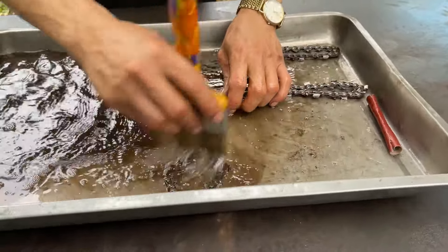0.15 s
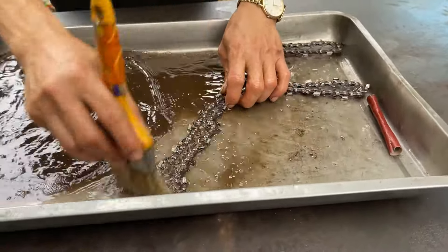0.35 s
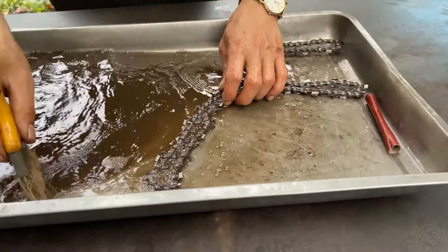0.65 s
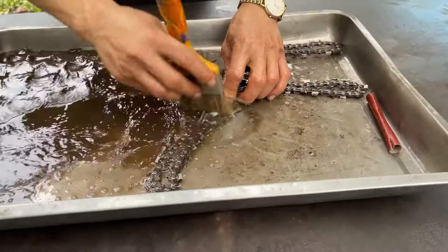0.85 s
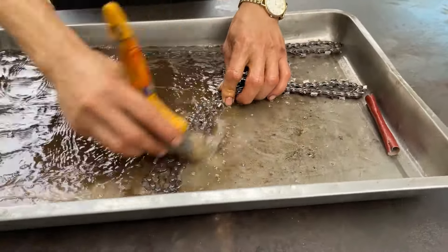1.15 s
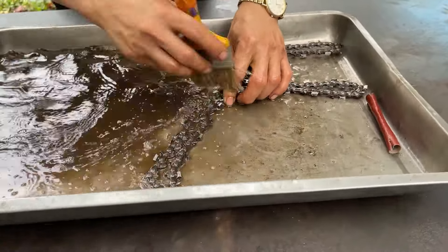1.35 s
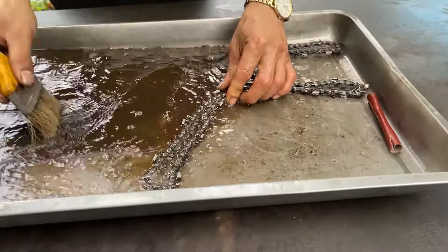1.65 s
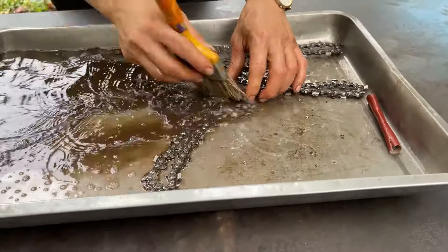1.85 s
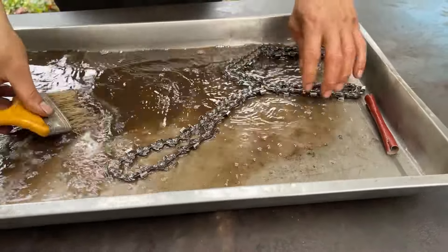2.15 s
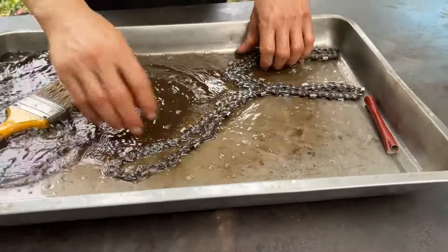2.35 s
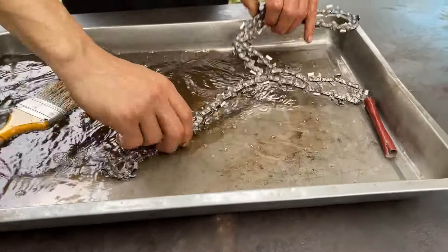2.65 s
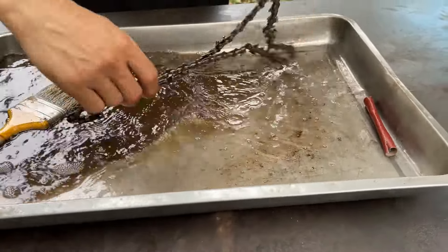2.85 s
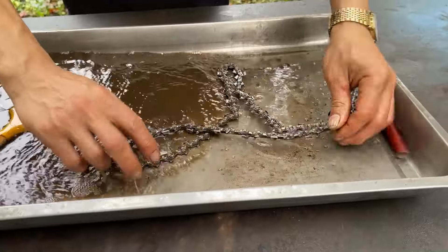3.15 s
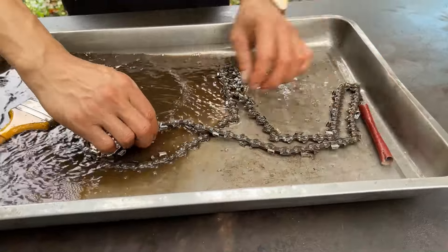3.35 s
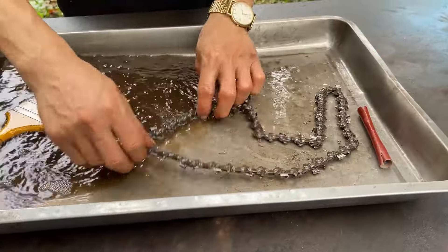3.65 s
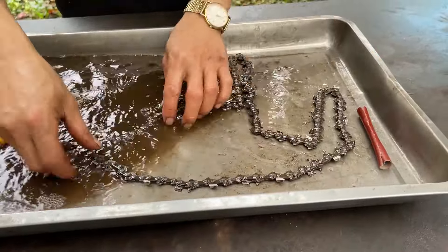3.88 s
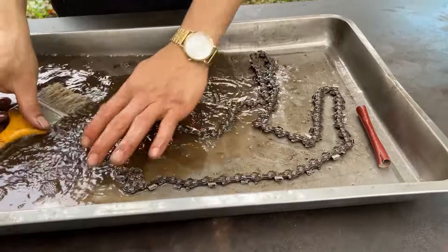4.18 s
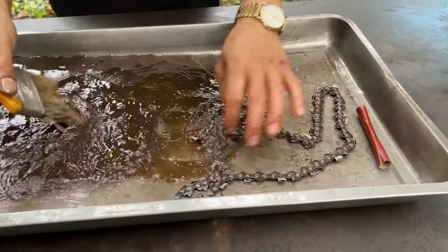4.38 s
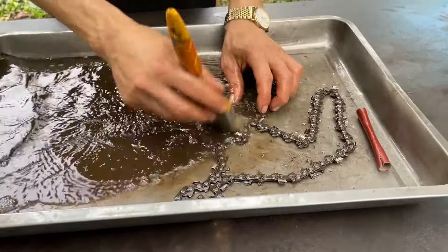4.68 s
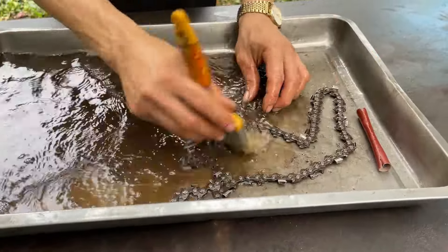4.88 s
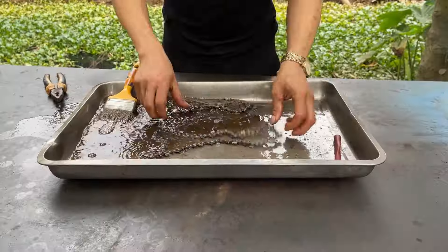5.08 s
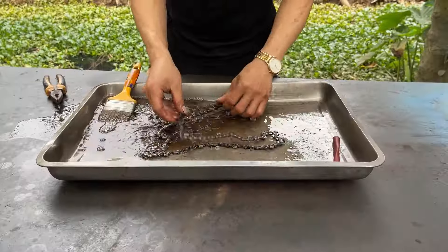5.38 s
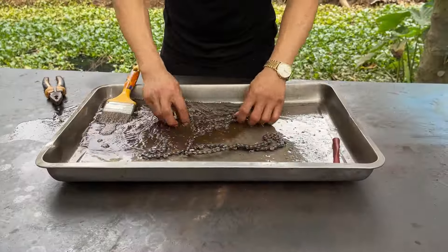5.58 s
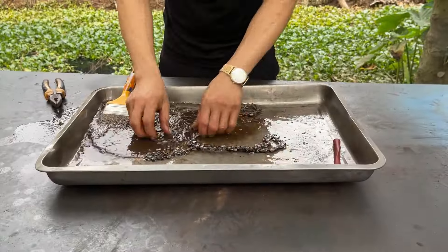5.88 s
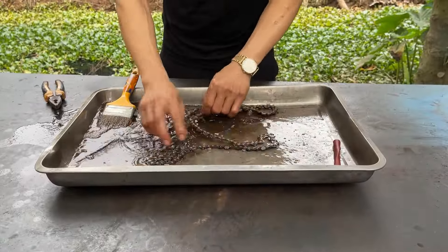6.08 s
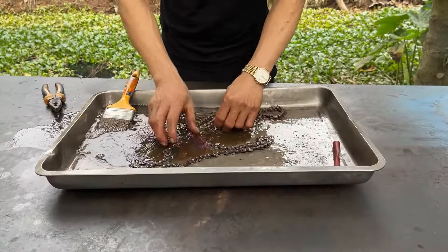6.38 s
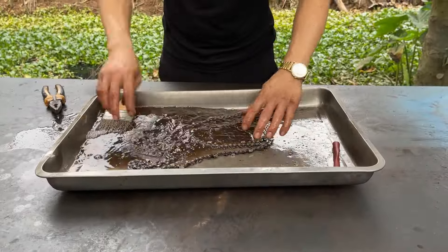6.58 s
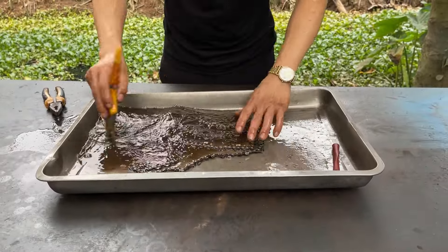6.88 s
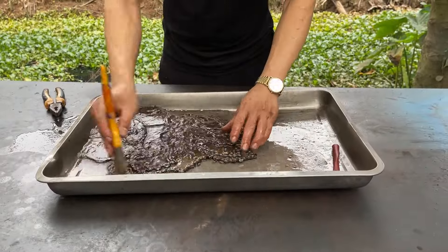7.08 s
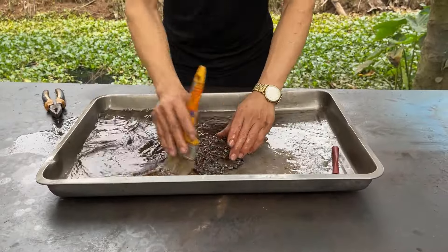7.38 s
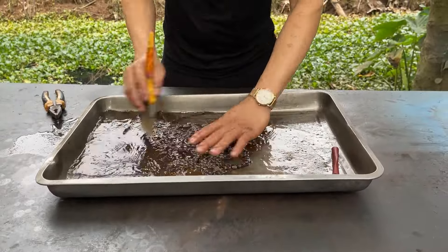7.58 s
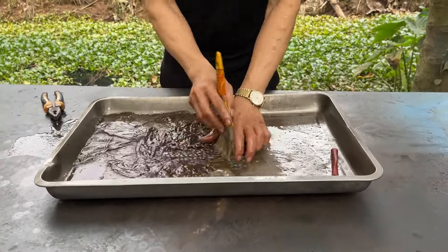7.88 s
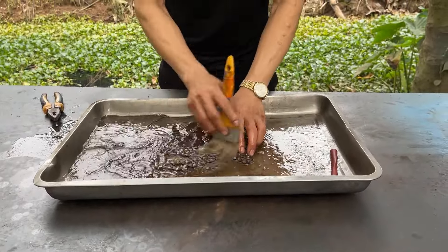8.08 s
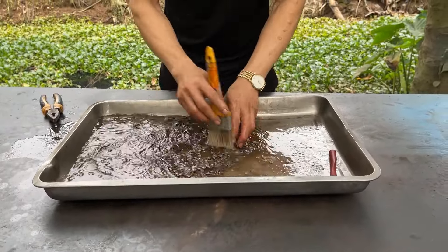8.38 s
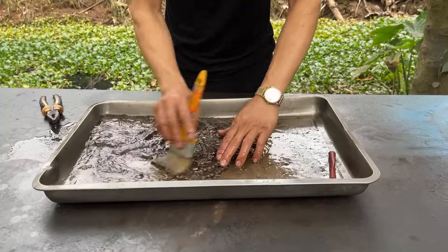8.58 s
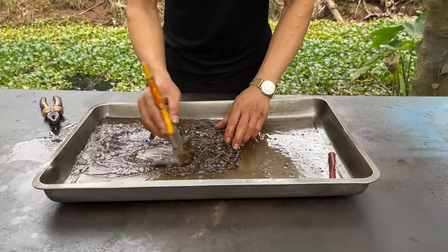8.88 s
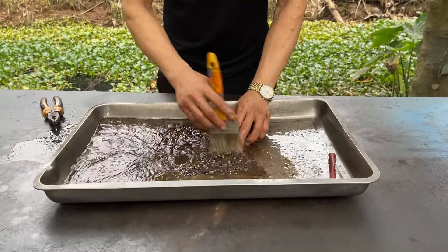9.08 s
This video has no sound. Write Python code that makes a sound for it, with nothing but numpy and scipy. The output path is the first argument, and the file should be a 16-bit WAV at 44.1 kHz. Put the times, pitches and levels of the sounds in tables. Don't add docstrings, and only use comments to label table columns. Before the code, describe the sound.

A wet metal chain is brushed, dragged and dropped in a shallow steel tray of liquid, with sharp clanks, rattling links and gritty bristle scraping outdoors.

```python
import sys
import numpy as np
from scipy import signal
from scipy.fft import rfft, irfft
from scipy.io import wavfile

SR = 44100
rng = np.random.default_rng(int(sys.argv[2]) if len(sys.argv) > 2 else 0)


def amp(db):
    return 10 ** (np.asarray(db, float) / 20)


def write(x):
    x = np.atleast_2d(x).T
    wavfile.write(sys.argv[1], SR, np.round(np.clip(x, -1, 1) * 32767).astype(np.int16))


N = 407484
SPLICE_S = 5.13


def rms_one(x):
    return x / np.sqrt(np.mean(x ** 2) + 1e-20)


def drift(rate):
    r = np.exp(-80 * np.pi * rate / SR)
    slow = signal.lfilter([1], [1, -2 * r, r * r], rng.standard_normal(N // 40 + 2002))[2000:]
    return np.interp(np.arange(N) / 40, np.arange(len(slow)), rms_one(slow))


def colour(x, points):
    hz, level_db = np.transpose(points)
    grid = np.maximum(np.fft.rfftfreq(8192, 1 / SR), 5)
    cepstrum = irfft(np.log(amp(np.interp(np.log(grid), np.log(hz), level_db))))
    cepstrum[1:4096] *= 2
    cepstrum[4097:] = 0
    response = irfft(np.exp(rfft(cepstrum)))
    return signal.fftconvolve(x, response[None] / np.linalg.norm(response), axes=1)[:, :N]


def resonance(x, hz, width_hz):
    r = np.exp(-np.pi * width_hz / SR)
    poles = [1, -2 * r * np.cos(2 * np.pi * hz / SR), r * r]
    return np.sqrt((1 - r * r) / 2) * signal.lfilter([1, 0, -1], poles, x + 1e-18)


def contacts(per_s, spread_db, clump_db, clump_rate, alike):
    born = rng.random(N) < per_s / SR
    sizes = amp(spread_db * np.minimum(rng.exponential(1, N), 3.2)) * rng.choice([-1, 1], N)
    clicks = rms_one(born * sizes)
    lag = np.round(40 * drift(6)).astype(int)
    right = clicks[np.clip(np.arange(N) + lag, 0, N - 1)]
    alike = np.clip(alike, 0, 1)
    pair = np.sqrt(alike) * np.array([clicks, right]) + np.sqrt(1 - alike) * rng.standard_normal((2, N))
    return rms_one(pair * amp(clump_db * drift(clump_rate)))


def strokes():
    # (full from [s], length [s], tray drone [dB], rasp against drone [dB]) brush sweeps and drags,
    # first at the near stand, then at the far one
    sweeps = [(0.12, 0.13, -35.5, -1.5), (0.172, 0.13, -36.5, 2), (0.3, 0.32, -33, -2),
              (0.826, 0.085, -35.5, -8.5), (0.956, 0.06, -47, 5.5), (1.01, 0.11, -34, -4.5),
              (1.24, 0.096, -32.5, -3), (1.468, 0.098, -51.5, 9), (1.527, 0.15, -39.5, 3),
              (1.953, 0.13, -43.5, -4.5), (2.03, 0.14, -31.5, -1.5), (2.075, 0.23, -34.5, 4.5),
              (2.594, 0.088, -33.5, 0), (2.776, 0.1, -32, 9.5), (2.82, 0.16, -34, 5.5),
              (3.332, 0.074, -24, -4), (3.684, 0.1, -33.5, -0.2), (4.01, 0.14, -27.5, 4),
              (4.075, 0.12, -29, 3.5), (4.258, 0.043, -38, -17), (4.345, 0.14, -28, 8),
              (4.41, 0.14, -30.5, 7.5), (4.995, 0.12, -28.5, 4),
              (5.534, 0.094, -24.5, -3.5), (5.651, 0.092, -38, 0), (5.702, 0.058, -37, -1.5),
                  (5.777, 0.19, -29.5, 2), (6.057, 0.17, -35.5, -3), (6.306, 0.15, -29.5, 1.5),
                  (6.51, 0.17, -33, 0.5), (6.821, 0.17, -28.5, 4), (7.053, 0.19, -30, 1),
                  (7.237, 0.14, -25.5, 3.5), (7.436, .1, -35, -2), (7.496, 0.11, -32.5, -1),
                  (7.928, 0.18, -26.5, 2), (8.171, 0.22, -30.5, -2), (8.378, 0.18, -28, -1),
                  (8.638, 0.1, -30.5, 0.5), (8.715, 0.31, -31, 0.5), (8.815, 0.25, -34.5, -0.5),
                  (8.959, 0.067, -37.5, -9), (9.082, 0.19, -34, -1.5)]
    pushes = [(0.05, 0.087, -38.5, -5.5), (0.47, 0.13, -40, -18), (0.545, 0.19, -38, 0.5),
              (0.608, 0.14, -38.5, 1), (0.777, 0.083, -36.5, -6), (1.88, 0.67, -65, -4),
              (2.452, 0.051, -44, -13), (2.69, 0.087, -32.5, 0.5), (2.887, 0.096, -36, 2.5),
              (3.142, 0.14, -33.5, -2), (3.475, 0.12, -37.5, -11), (3.63, 0.17, -31, -8.5),
              (3.777, 0.11, -24.5, 0.5), (4.228, 0.036, -42.5, -9), (4.817, 0.15, -28.5, 4),
              (5.11, 0.043, -43, -40), (6.245, 0.058, -33.5, -6.5), (6.438, 0.15, -37, -2.5),
              (7.845, 0.26, -28, 4), (6.59, 0.082, -39, 3), (8.093, 0.056, -34.5, -2),
              (8.132, 0.049, -30, -1)]
    link_drops = [(0.0, 0.088, -29.5, 0.5), (0.385, 0.069, -26.5, 5), (0.738, 0.023, -44.5, -2),
                  (1.044, 0.026, -27, -9), (1.119, 0.024, -41, -10), (1.246, .02, -28.5, -11),
                  (1.26, 0.016, -28, -9), (1.27, 0.012, -30, -8), (1.338, 0.025, -37.5, -14),
                  (1.639, 0.032, -41, -28), (1.747, 0.27, -47.5, 3.5), (2.288, 0.036, -17.5, -3),
                  (2.331, 0.045, -23, -10.5), (2.407, 0.032, -32, -7), (2.483, 0.031, -26.5, -4.5),
                  (2.655, 0.02, -36.5, -1), (2.748, .03, -34.5, -5), (3.031, 0.059, -19, -6.5),
                  (3.113, 0.044, -31.5, -1), (3.167, 0.031, -24, -3), (3.202, 0.043, -21, -2.5),
                  (3.253, 0.052, -26, -3), (3.304, 0.032, -37.5, -10), (3.431, 0.044, -38.5, -2),
                  (3.727, 0.1, -30.5, 4.5), (3.956, 0.098, -37, -10), (4.132, 0.045, -26.5, 1.5),
                  (4.287, 0.026, -45, -9), (4.313, 0.03, -36, 5), (4.328, .06, -37, 1),
                  (4.36, 0.069, -27.5, 10.5), (4.51, 0.18, -51.5, 6), (4.738, 0.13, -35, -5),
                  (4.804, .04, -35, 6), (4.973, 0.034, -31.5, 4),
                  (5.161, 0.027, -36, -5), (5.176, .012, -31, -4), (5.181, 0.065, -22, -1),
                 (5.316, .02, -42, -1), (5.327, 0.032, -32.5, -15), (5.394, 0.083, -32, -3),
                 (5.493, .015, -33, -3), (5.502, 0.081, -20.5, -4), (5.961, 0.2, -36, -4.5),
                 (6.145, 0.077, -24, 1), (6.772, 0.071, -38, -5), (7.0, .05, -46.5, 7),
                 (7.082, .04, -35, -3), (7.229, .05, -28, 9), (7.491, .04, -39, -4), (7.198, .05, -46, -7),
                 (7.535, 0.066, -26, 1), (7.561, 0.058, -31.5, -6), (7.733, 0.44, -31, -0.5),
                 (8.259, 0.13, -29.5, -2)]
    sweep_shape = (0.25, 0.14, 0.55, 1.75)
    push_shape = (0.4, 0.14, 0.3, 1.66)
    drop_shape = (0.0, 0.08, 0.92, 1.25)
    drop_rise_s = 0.0027
    touch_s, touch_db, weight_after_s = 0.017, -17, 0.0016

    drops = link_drops
    kinds = [(sweeps, sweep_shape), (pushes, push_shape), (drops, drop_shape)]
    rows = [(*row, *shape) for table, shape in kinds for row in table]
    rows += [(s, touch_s, db + touch_db, rasp_db + 10.0, 1, 0, .3, 1.775) for s, _, db, rasp_db in drops]
    s, length, drone_db, rasp_db, rise, hold, fall, roundness = np.transpose(rows)[:, :, None]
    s = s + weight_after_s * (rise * length < drop_rise_s)

    grid = np.arange(0, N + 32, 32) / SR
    before = np.maximum(s - grid, 0) / np.maximum(rise * length, drop_rise_s)
    after = np.maximum(grid - s - hold * length, 0) / np.maximum(fall * length, .005)
    away = np.minimum(before + after, 5).astype(np.float32) ** roundness.astype(np.float32)
    drone = np.sum(amp(4.033 * (drone_db - 17.8 * away)), axis=0) ** (1 / 4)
    rasp = np.sum(amp(3.906 * (drone_db + rasp_db - 25.5 * away)), axis=0) ** (1 / 4)
    return [np.interp(np.arange(N) / SR, grid, e) for e in (drone, rasp)]


def knocks():
    # (time [s], peak [dB], rasp against peak [dB], loudest
    # ring [Hz])
    tray_knocks = [(0.386, -13.5, -16, 1560), (0.744, -24, -16, 910), (1.045, -3.5, -6, 1080),
                   (1.117, -30.5, 2.5, 1150), (1.245, -26, -12, 1580), (1.338, -22, -31, 1170),
                   (1.642, -23, -37, 1195), (1.749, -33, -23, 1210), (1.879, -31, -11, 3120),
                   (1.908, -33, -11, 2355), (1.907, -30.5, -19, 1400), (1.962, -25, -21, 826),
                   (1.939, -27, -25, 830), (2.033, -25, 12, 830), (2.29, -9, -4, 1076),
                   (2.296, -16, -12, 1570), (2.333, -16, -14, 820), (2.407, -23.5, -11, 744),
                   (2.483, -21, -2.5, 810), (2.601, -14, -15, 1444), (3.035, -7.5, -24, 600),
                   (3.136, -24, 5, 770), (3.204, -10, 7, 1406), (3.26, -15, 3, 1590), (3.306, -17, 1, 784),
                   (3.34, -14, -9, 997), (3.725, -17, -5, 1420), (3.764, -14, -6, 2220),
                   (3.783, -7.5, 10, 2320), (3.782, -10, -19, 305), (4.005, -17, -10, 1570),
                   (4.135, -13.5, -2, 1240), (4.733, -19, -5, 1420),
                   (5.183, -5.5, -2, 920), (5.505, -9, -4, 742), (5.535, -12, 3, 867),
                  (6.145, -23, -11, 1380), (6.773, -29, -5, 880), (6.859, -30, -10, 1760),
                  (7.202, -21, -4, 1020), (7.247, -5, -1, 1490), (7.734, -21.5, -30, 1220),
                  (7.893, -19, -17, 820), (8.176, -11, -7, 1536), (8.394, -13.5, -2, 816),
                  (8.392, -12.5, 4, 1406), (8.722, -11, -4, 840)]
    t60_at_1khz_s, damping = 0.076, 0.43
    swell_s, choke_s = 0.002, 0.015
    glide_per_s = 2.5

    thud, crack, rings = np.zeros((2, N)), np.zeros((2, N)), np.zeros((2, N))
    t = np.arange(int(.1 * SR)) / SR
    rise = 1 - np.exp(-t / 0.0018)
    ring_swell = (1 - np.exp(-t / swell_s)) * np.exp(-(t / choke_s) ** 2)
    table = tray_knocks
    chance = rng.standard_normal((len(table), 3))
    for (s, peak_db, crack_db, hz), (lag, pan, phase) in zip(table, chance):
        t60 = np.clip(t60_at_1khz_s * (1000 / hz) ** damping, .02, .3)
        beat_hz = hz * (1 + 0.042 * (lag + 3 * np.sign(lag)))
        for side in range(2):
            at = max(0, round(s * SR + (side - .5) * 22 * lag))
            span, room = slice(at, at + len(t)), N - at
            gain = amp(peak_db + 0.82 * pan * (2 * side - 3)) * rise
            thud[side, span] += (gain * amp(-63.0 - 60 * t / t60))[:room]
            crack[side, span] += (gain * amp(crack_db - 10.0 - 60 * t / (0.4 * t60)))[:room]
            tone = np.sin(2 * np.pi * hz * t * (1 + glide_per_s * t * pan) + 3 * phase * side)
            tone += 0.26 * np.sin(2 * np.pi * beat_hz * t + 3 * pan * side)
            rings[side, span] += (gain * amp(-3.0 - 60 * t / (2.1 * t60)) * ring_swell * tone)[:room]
    return thud, crack, rings


def strikes():
    # (time [s], peak [dB], brightness [dB])
    link_strikes = [(0.386, -3.5, -10), (1.047, -17, -14), (1.116, -27, 4), (1.642, -30, -11),
                    (1.908, -36, 0), (1.96, -30, -7), (2.29, -6.5, -6.5), (2.332, -10, -12),
                    (2.405, -24, -2), (2.455, -23.5, 1), (2.484, -27, -5), (2.582, -23, -7),
                    (2.656, -31, -5), (2.686, -28, -26), (2.768, -25, -4), (3.034, -6, 1.5),
                    (3.113, -21, 2), (3.144, -21, 11), (3.166, -16.5, 0), (3.204, -8, -9), (3.253, -15, 2),
                    (3.306, -20, 0), (3.325, -24, -6), (3.351, -6, -0.5), (3.725, -15, -6),
                    (3.765, -10, -14), (3.783, -7, 1.5), (4.007, -21.5, -9), (4.135, -5.5, -5.5),
                    (4.222, -31, -16), (4.287, -25, -20), (4.733, -27.5, -3), (4.99, -18, -17),
                    (5.161, -20, 1), (5.184, -1, -15), (5.187, -7.5, -5), (5.328, -28, -12),
                    (5.399, -11, -5), (5.505, -16, 0), (5.534, -27, 7), (5.702, -21, 5), (6.146, -22, -15),
                    (6.773, -15, -9), (6.806, -20, 2), (7.2, -22.5, 0), (7.537, -6.5, -7),
                    (7.564, -10, 0.5), (7.736, -12, -26), (7.896, -5, -17), (8.178, -15, 1),
                    (8.399, -8.5, -3.5), (8.609, -26, -6)]
    strike_db, bounce_s, bounce_loss_db = 6, .0035, 2
    rise_s, crack_t60_s = 0.00036, 0.019

    clicks, burst = np.zeros((2, N)), np.zeros(N)
    chance = rng.random((len(link_strikes), 12))
    for (s, peak_db, bright_db), row in zip(link_strikes, chance):
        at = s + np.cumsum(bounce_s * (.4 + row[:4])) - bounce_s * (0.404 + row[0])
        for side in range(2):
            signs = np.sign(row[4 + 4 * side:8 + 4 * side] - .5)
            sizes = amp(strike_db + peak_db - bounce_loss_db * np.arange(4)) * signs
            clicks[side, (at * SR).astype(int) + side * int(30 * row[0])] += sizes
        burst[int(s * SR)] = amp(peak_db + bright_db - 12.0)
    rise, fall = np.exp(-1 / (rise_s * SR)), amp(-60 / (crack_t60_s * SR))
    return clicks, signal.lfilter([1 - rise], np.convolve([1, -rise], [1, -fall]), burst + 1e-12)


def settling():
    # (time [s], half length [s], depth [dB])
    lulls = [(0.71, 0.019, 7.5), (1.16, 0.018, 5.5), (1.41, 0.081, 7), (1.8, 0.22, 15.4),
             (2.24, 0.064, 6.3), (2.97, 0.048, 8.6), (3.89, 0.11, 13), (4.2, 0.037, 11), (4.6, 0.085, 7.2),
             (4.67, 0.022, 8), (5.92, 0.019, 42), (6.695, 0.13, 23), (6.97, 0.017, 20), (7.38, 0.02, 3.3),
             (7.66, 0.092, 14), (8.56, 0.043, 19)]
    t = np.arange(0, N + 32, 32) / SR
    sunk = sum(depth_db * np.exp(-((t - s) / half) ** 4) for s, half, depth_db in lulls)
    return -39 - np.interp(np.arange(N) / SR, t, sunk)


def tray(drive, other_drive, modes_db, far_db):
    # (frequency [Hz], width [Hz], level [dB])
    floor_modes = [(517.5, 42, -7), (800, 38, 2.5), (920, 81, -6.5), (1114, 100, 0), (1265, 45, 1),
                   (1390, 120, -8), (1505, 68, 2.5), (1580, 124, -6), (1840, 110, -2), (1990, 115, -8)]
    # (frequency [Hz], level [dB per Hz])
    drone_colour = [(130, -23.5), (220, -11.5), (265, -18), (512, 0), (661, -2.5), (805, 3.5), (1570, 1.5),
                    (3500, -12.5), (4550, -11.5), (7700, -120)]
    mode_shift = .045

    power = sum(amp(2 * level_db) * width_hz for hz, width_hz, level_db in floor_modes)
    modes, far = 0, np.arange(N) / SR > SPLICE_S
    for k, (hz, width_hz, level_db) in enumerate(floor_modes):
        share = amp(level_db) * np.sqrt(width_hz / power) * rng.choice([-1, 1], (2, 1))
        strength = other_drive * amp(2.0 * drift(5.5) + (k == 0) * far_db * far)
        turn = np.pi / 4 * (1 + np.tanh(3.0 * drift(2.8)))
        shift = mode_shift * (k > 1)
        lower = resonance(strength * np.cos(turn), hz * (1 - shift), width_hz)
        upper = resonance(strength[::-1] * np.sin(turn), hz * (1 + shift), width_hz)
        modes = modes + share * (lower + upper)
    return (colour(drive, drone_colour) + amp(modes_db) * modes) / np.sqrt(1 + amp(2 * modes_db))


def wet_links(drive, clink_db, patchy_db):
    # (frequency [Hz], level [dB per Hz])
    rasp_colour = [(1290, -17.5), (2200, -0.5), (2650, -4), (5670, -5), (10500, -1), (11100, -4),
                   (12400, -11), (15100, -7), (15700, -28), (17000, -28.5)]
    pitches = np.geomspace(2600, 11000, num=9)
    clinks = sum(resonance(drive * amp(patchy_db * drift(18)), hz, hz / 14) for hz in pitches)
    peak = amp(-20.5) * resonance(drive, 10730, 530)
    return colour(drive + amp(clink_db) * clinks / 3 + peak, rasp_colour)


def slosh(push):
    # (time [s], level [dB])
    waves = [
        (0.79, -42.5),
        (1.26, -41),
        (3.19, -41),
        (3.65, -59),
        (5.44, -36.5),
        (7.92, -70),
        (8.42, -41),
        (8.7, -44),
    ]
    wave_fade_db_per_s = 153
    slosh_db, lag_s, follows, rest_db = 2.5, 0.0032, 1.78, -56.5

    t, r = np.arange(N) / SR, np.exp(-1 / (lag_s * SR))
    lagging = np.abs(signal.lfilter([1 - r], [1, -r], push))
    level = amp(slosh_db) * lagging ** follows + amp(rest_db)
    coarse = t[::32]
    waves_db = np.max([db - wave_fade_db_per_s * abs(coarse - s) for s, db in waves], axis=0)
    level = level + np.interp(t, coarse, amp(waves_db))
    noise = rng.standard_normal((2, N)) * amp(2.2 * drift(22))
    band = signal.butter(2, [150, 420], "band", fs=SR, output="sos")
    return level * rms_one(signal.sosfilt(band, noise))


def judder():
    # (centre [s], half length [s], slip rate [per s], level [dB])
    slipping = (5.45, 0.075, 72, -29)
    centre, half, per_s, level_db = slipping
    t = np.arange(N) / SR
    slips = np.diff(np.floor(per_s * (t + .002 * drift(20))), prepend=0) != 0
    slips = slips * np.exp(-((t - centre) / half) ** 4)
    rung = resonance(slips, 170, 60) + 1.0 * resonance(slips, 210, 60) + 0.42 * resonance(slips, 65, 40)
    rung = signal.sosfilt(signal.butter(4, 270, fs=SR, output="sos"), rung)
    return amp(level_db) * rung / np.max(abs(rung))


def insect():
    # (time [s], pitch [Hz], glide [Hz per s], level [dB], half length [s])
    whistles = [
        (6.673, 2940, 0.5, -55, 0.057),
        (6.742, 2940, 0.5, -64, 0.04),
        (7.68, 4570, 3500, -62, .045),
    ]
    t, out = np.arange(N) / SR, 0
    flutter_db, waver = 4.3 * drift(34.6), .4 * drift(35)
    for s, hz, glide, level_db, half in whistles:
        swell = amp(level_db + flutter_db) * np.exp(-((t - s) / half) ** 2)
        phase = 2 * np.pi * (hz + glide * (t - s) / 2) * (t - s)
        out = out + swell * np.sin(phase + waver + [[0], [2]])
    return out


def wind():
    # (time [s], level [dB])
    gusts = [(0.0, -47.5), (1.39, -45.5), (2.83, -50), (2.91, -40), (2.98, -50.5), (3.57, -47), (3.68, -56),
             (4.12, -43), (4.35, -55), (5.09, -45), (5.27, -58), (5.43, -40), (5.84, -49.5), (6.25, -47.5),
             (6.61, -54.5), (7.59, -47), (7.64, -51), (9.24, -48.5)]
    # (frequency [Hz], level [dB per Hz])
    rumble_colour = [(12, -30), (20, 0), (87, 4.5), (220, -9.5), (290, -59), (480, -120)]
    t = np.arange(N) / SR
    gust_s, gust_db = np.transpose(gusts)
    noise = rng.standard_normal((2, N)) + 0.67 * rng.standard_normal(N)
    lumps = amp(2.0 * drift(9.1) + 1.1 * np.array([drift(21), drift(24)]))
    rumble = rms_one(colour(noise * lumps, rumble_colour))
    thinned = signal.sosfilt(signal.butter(2, 48, "high", fs=SR, output="sos"), rumble)
    return amp(np.interp(t, gust_s, gust_db) + 3.5) * np.where(t < SPLICE_S, rumble, thinned)


def open_air():
    # (frequency [Hz], level [dB per Hz])
    air_colour = [(150, -5), (250, 3.5), (800, -8), (2000, -24), (5500, -21.5), (8000, -33), (16000, -40)]
    return amp(-57) * colour(rng.standard_normal((2, N)), air_colour)


def scene():
    drone, hiss = strokes()
    thud, crack, rings = knocks()
    clicks, burst = strikes()
    settle_db = settling()
    links = contacts(per_s=1500, spread_db=1.0, clump_db=1.5, clump_rate=20, alike=0.89)
    grit = contacts(per_s=3500, spread_db=1.0, clump_db=2.0, clump_rate=37, alike=0.82)

    push = amp(1.72) * drone + amp(settle_db - 11.5) + thud
    body = tray(links * push + clicks, grit * push + clicks, modes_db=-4.0, far_db=8.5)
    weight = np.clip((drone + 0.0015) / (hiss + 0.00067), .4, 1.5)
    low = signal.sosfilt(signal.butter(1, 700, fs=SR, output="sos"), body)
    body = body + (weight - 1) * low + rings

    scrape = amp(-1.5) * hiss + amp(settle_db - 14.0) + crack + burst
    rasp = wet_links(grit * scrape, clink_db=-19.0, patchy_db=4.5)
    tilt = amp(np.where(np.arange(N) / SR < SPLICE_S, .3, -.8) * [[1], [-1]])
    return tilt * (body + rasp) + slosh(drone) + judder() + wind() + open_air() + insect()


def band_limit(x):
    return signal.sosfilt(signal.butter(12, 15760, fs=SR, output="sos"), x)


def record(dry):
    return_s, fade_s, limit = 5.147, 0.042, 1.3
    t = np.arange(N) / SR
    gate = np.where(t < SPLICE_S, 1, np.clip((t - return_s) / fade_s, .14, 1))
    mix = limit * np.tanh(dry * gate / limit)
    return band_limit(mix)


dry = scene()
out = record(dry)
write(out)
```